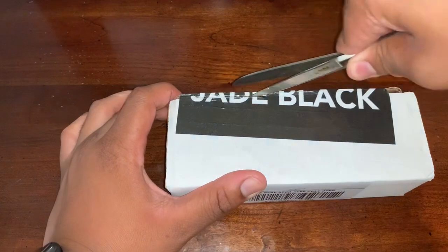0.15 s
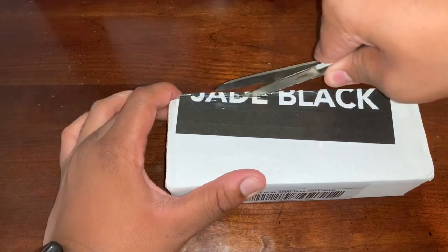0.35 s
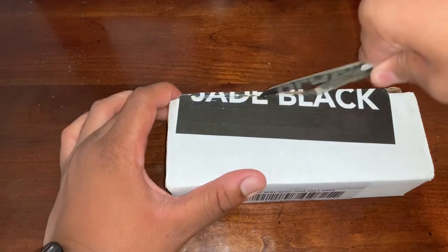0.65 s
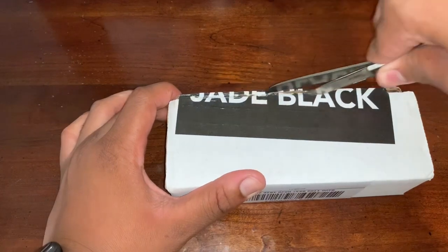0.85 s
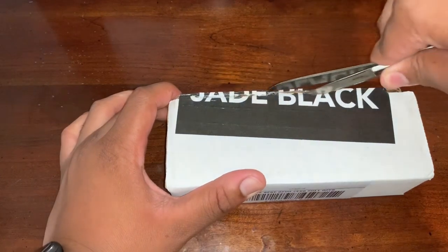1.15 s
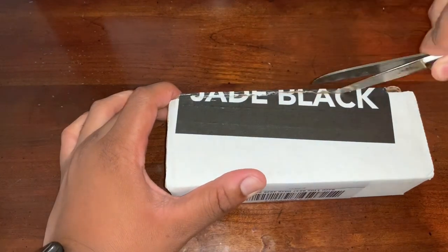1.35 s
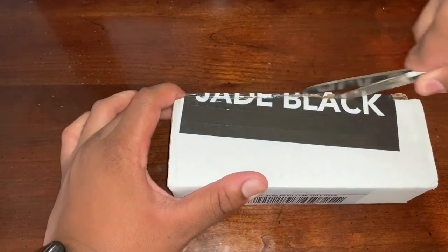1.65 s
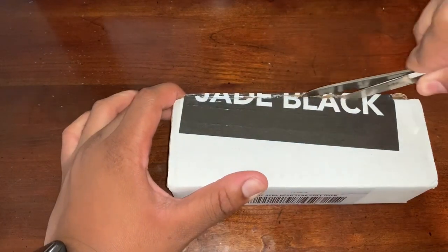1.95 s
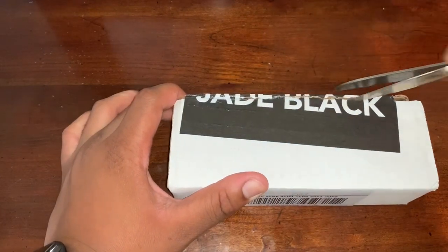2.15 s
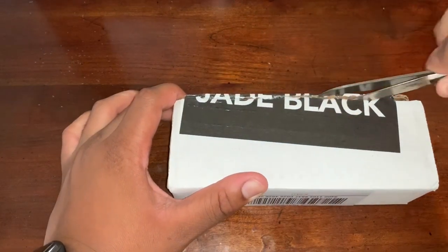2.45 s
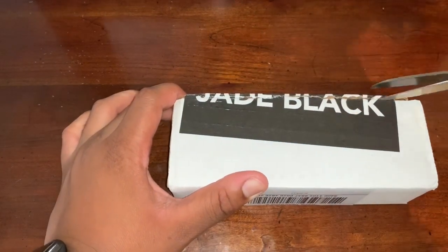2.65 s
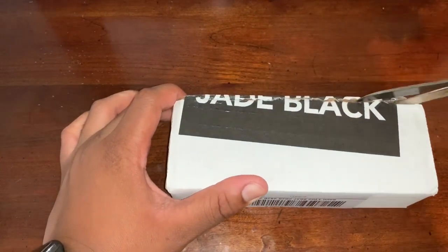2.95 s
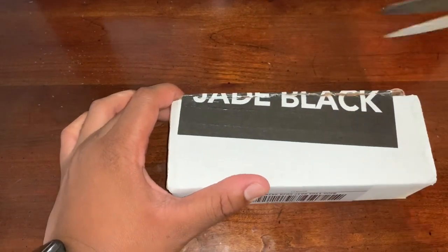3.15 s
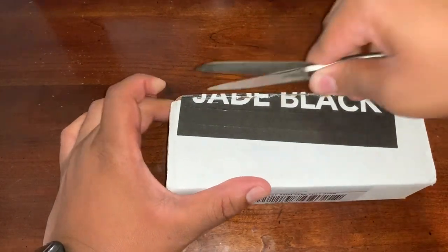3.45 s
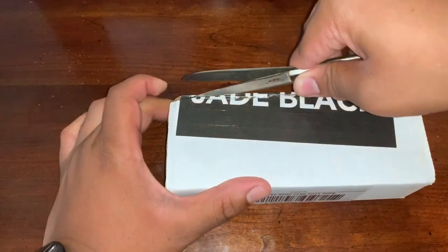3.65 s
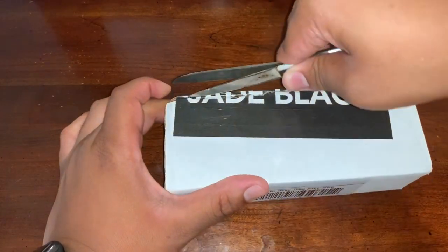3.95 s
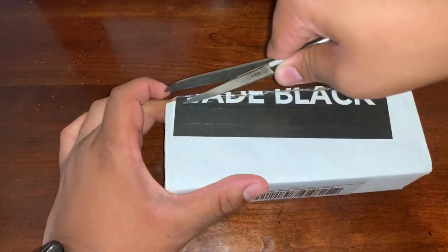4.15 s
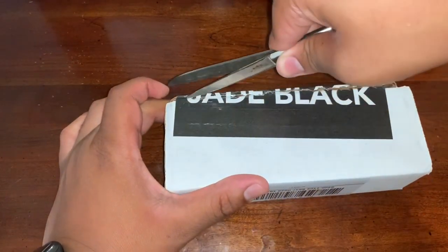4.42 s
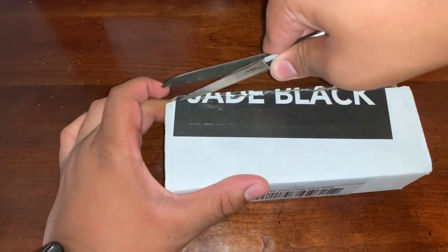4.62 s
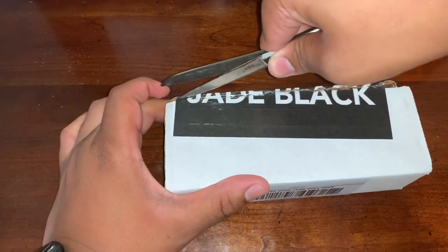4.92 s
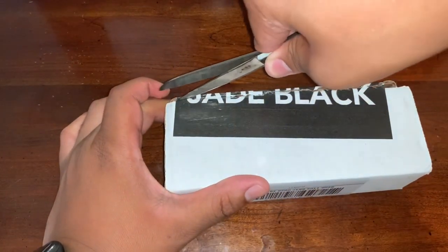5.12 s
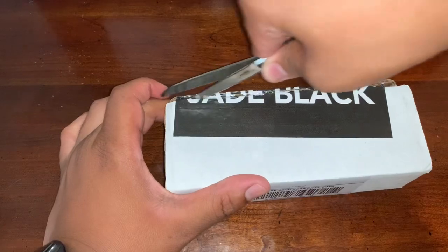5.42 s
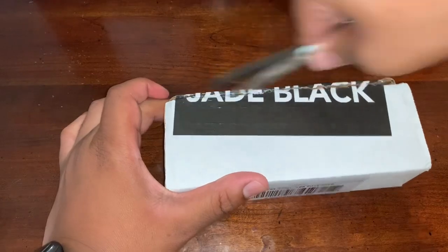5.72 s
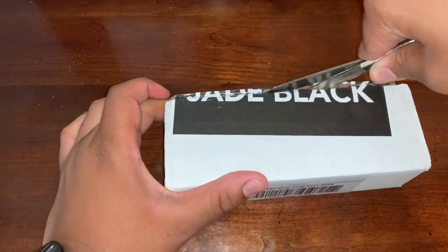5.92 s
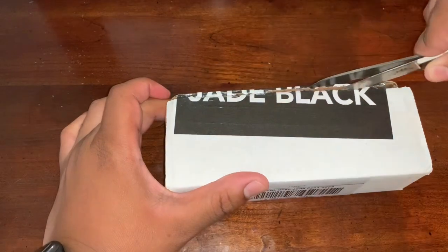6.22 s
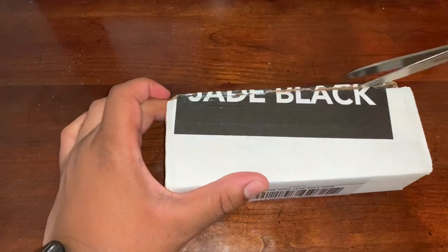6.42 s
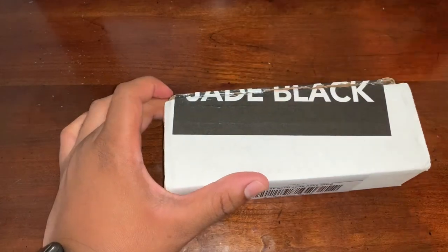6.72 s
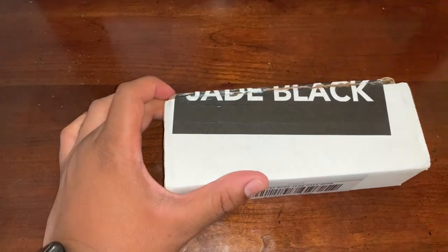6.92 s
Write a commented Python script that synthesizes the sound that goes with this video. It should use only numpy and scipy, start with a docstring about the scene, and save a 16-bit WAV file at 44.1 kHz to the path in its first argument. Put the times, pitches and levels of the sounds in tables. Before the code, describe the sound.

Close, dry cardboard cutting: short scratchy scrapes, popping tears and boxy thuds, a nearly silent middle, more ripping, and a bright metallic snip at the end.

```python
"""A small, quiet room: one blade of open scissors is dragged in short strokes through a box's taped seam.
Bursts of breaking fibres, filtered by box and blade resonances, make the rasp, snaps and rips.
Decaying sines thump as the cardboard wall springs back; in a pause the tip ticks and the blade brushes the lid.
At the end the scissors clack shut: a rattling clash and a short ring of blade modes."""
import sys
import numpy as np
from scipy import signal
from scipy.fft import rfft, irfft
from scipy.io import wavfile

SR = 44100
rng = np.random.default_rng(int(sys.argv[2]) if len(sys.argv) > 2 else 0)


def dump_mix(stems):
    """Bounce the given channels to the path in sys.argv[1] as a 16-bit WAV at rate SR."""
    frames = np.atleast_2d(stems).T  # one column per channel
    limited = np.clip(frames, -1, 1)  # hard clip at full scale
    pcm = np.round(limited * 32767).astype(np.int16)
    wavfile.write(sys.argv[1], SR, pcm)


N = 311738  # samples

# level_db columns set how strong each event is; some players add an offset.


def amp(db):
    """Decibels to gain."""
    return 10 ** (np.asarray(db) / 20)


def evened(x):
    """Scaled to rms 1."""
    return x / np.sqrt(np.mean(x ** 2) + 1e-20)


def read(points, hz):
    """A table joined by straight lines on a log-frequency axis."""
    point_hz, value = np.transpose(points)
    return np.interp(np.log(hz + 1), np.log(point_hz + 1), value)


def add(mix, start_s, sound):
    """Mixes a sound in at a given second."""
    first = max(round(start_s * SR), 0)
    part = mix[:, first:][:, :sound.shape[-1]]
    part += sound[..., :part.shape[1]]


def filtered(x, hz, kind="low", order=2):
    """A gentle low-pass or high-pass."""
    return signal.sosfilt(signal.butter(order, hz, kind, fs=SR, output="sos"), x)


def wander(count, hz):
    """Low-passed noise of rms 1."""
    noise = rng.standard_normal(count + SR)
    return evened(filtered(noise, hz)[SR:])  # first second dropped: filter settling


def ring(spectrum, peaks=(), tilt_db=0, size=4096):
    """Causal unit-energy impulse response: a smooth spectrum with resonances and a tilt per octave."""
    hz = abs(np.fft.fftfreq(size, 1 / SR))
    db = read(spectrum, hz) + tilt_db * np.log2(np.maximum(hz, 300))
    for centre_hz, width_hz, lift_db in peaks:
        db = db + lift_db / (1 + (2 * (hz - centre_hz) / width_hz) ** 2)
    minimum_phase = np.exp(np.conj(signal.hilbert(np.log(amp(db)))))
    response = np.fft.ifft(minimum_phase).real[:size // 2]
    return response[None] / np.linalg.norm(response)


def fibres(count, per_s, spread_db):
    """Two channels of snaps of very unequal size, at random moments shared by both."""
    size = amp(spread_db * np.minimum(rng.exponential(1, count), 4))
    size = size * (rng.random(count) < per_s / SR)
    return evened(size * rng.standard_normal((2, count)))


def burst(length_s, response, fade=0.11, rise_s=0.000076, spread_db=1.5):
    """A run of tiny fractures builds up and rings a body; energy is set to rms 1 over the run."""
    count = max(round(length_s * SR), 30)
    t = np.arange(count) / SR
    rise = (1 - np.exp(-(t + 1 / SR) / rise_s)) ** 2
    run = fibres(count, 14000, spread_db) * np.exp(-fade * t / length_s) * rise
    sound = signal.fftconvolve(run, response, axes=1)
    return sound * np.sqrt(count / (np.sum(sound ** 2, 1, keepdims=True) + 1e-20))


def modes(table, seconds, detune=1, stretch=0, relax_s=0.013):
    """Decaying sines; a stretched wall starts sharp and sinks to its own pitch."""
    t = np.arange(int(seconds * SR)) / SR
    warped = t + stretch * relax_s * (1 - np.exp(-t / relax_s))
    return sum(amp(db - 60 * t / t60_s) * np.sin(2 * np.pi * hz * detune * warped)
               for hz, db, t60_s in table)


def contact(resonances, spread_db, shift=0.022):
    """Each place on the seam favours other resonances and detunes them."""
    chance = rng.standard_normal((len(resonances), 2))
    return [(hz * (1 + shift * a), width_hz, lift_db + spread_db * b)
            for (hz, width_hz, lift_db), (a, b) in zip(resonances, chance)]


# room rumble spectrum: pitch_hz, relative_db
AIR_SPECTRUM = [(15, -63.5), (28, -20.5), (85, -4), (123, -1), (242, -19.5), (516, -21.5), (950, -32),
                (1260, -31.5), (3340, -43), (8590, -46.5), (16000, -52)]


def air(level_db=-58.0, waver_db=1.0, waver_hz=7):
    """Low rumble of the room: shaped noise, wavering a little."""
    hz = np.fft.rfftfreq(N, 1 / SR)
    rumble = irfft(rfft(rng.standard_normal((2, N))) * amp(read(AIR_SPECTRUM, hz)), N)
    return amp(level_db + waver_db * wander(N, waver_hz)) * evened(rumble)


# saw strokes: start_s, level_db, wall_db (extra wall sound)
STROKES = [(-.27, -51, -2), (.15, -52, 2), (.39, -52, -7.5), (0.557, -53, -4), (.72, -54, -3),
           (.955, -52.5, -6.5), (1.105, -48.5, -6), (1.32, -49.5, -0.5), (1.53, -49.5, -6.5),
           (1.77, -50, -2.5), (1.975, -49.5, -5), (2.195, -50.5, -3.5), (2.4, -46, -5.5),
           (2.597, -44, -2.5), (2.8, -48.5, -5.5), (5.125, -53.5, 2.5), (5.251, -45.5, 1.5),
           (5.539, -48.5, -2.5), (5.756, -51, 0), (5.935, -48.5, -6.5), (6.13, -56, 1.5),
           (6.275, -44.5, -7.5)]
# blade leaves the seam, next stroke goes forth: time_s
LIFTS_S = [1.725, 1.935, 2.998, 5.243, 5.464, 6.24, 6.485]
# fastest moment as share of a stroke; SLIP: stroke that ends in a lift
FORTH_PEAK, BACK_PEAK, SLIP_PEAK = 0.5, 0.44, 0.72
OVERLAP_S = 0.013  # forward stroke runs into the return
BRISK_S, REST_SHARE = 0.17, 0.35  # after a longer return the hand rests for this share of the excess


def sawing():
    """Strokes alternate forth and back until a lift: (start_s, fastest_s, end_s, level_db, wall_db)."""
    turns_s = np.sort([row[0] for row in STROKES] + LIFTS_S)
    rows, forth = [], True
    for start_s, db, wall_db in STROKES:
        turn_s = turns_s[turns_s > start_s][0]
        lifted = turn_s in LIFTS_S
        if lifted:
            end_s, peak = turn_s, SLIP_PEAK
        elif forth:
            end_s, peak = turn_s + OVERLAP_S, FORTH_PEAK
        else:
            end_s, peak = turn_s - REST_SHARE * (turn_s - start_s - BRISK_S), BACK_PEAK
        fastest_s = start_s + np.clip(peak, .1, .9) * (end_s - start_s)
        rows.append((start_s, fastest_s, end_s, db, wall_db))
        forth = not forth or lifted
    return rows


LURCH_DB, LURCH_S = 18.5, 0.041  # gain added to the rip level, decay time constant


def lurch(t):
    """Gain of the rasp as the blade shoots ahead after each rip and is braked again."""
    return 1 + sum(amp(db + LURCH_DB) * (t > rip_s) * np.exp(-abs(t - rip_s) / LURCH_S)
                   for rip_s, db, _, _ in RIPS)


SLIP_HZ, SLIP_SPREAD, SLIP_DB = 170.85, .2, 8  # mean rate, unevenness, depth before the wedged scaling


def judder(count, wedged):
    """Gain of an edge that sticks and slips in an uneven rhythm, the deeper the more it is wedged."""
    turns = np.cumsum(SLIP_HZ * (1 + SLIP_SPREAD * wander(count, SLIP_HZ))) / SR
    return evened(amp(SLIP_DB * (1 + wedged) / 2 * np.cos(2 * np.pi * turns)))


def places(size, count):
    """Overlapping fades that hand a stroke on from one place to the next."""
    travel = np.linspace(0, count - 1, size)
    return [np.maximum(1 - abs(travel - place), 0) for place in range(count)]


# rasp spectrum: pitch_hz, relative_db_per_hz
RASP_SPECTRUM = [(40, -10), (110, 12), (180, 15), (320, -2), (560, 1.5), (1000, -3), (1500, 2),
                 (2500, -2.5), (5000, -3), (7000, -4.5), (10500, -6.5), (15500, -10.5)]
# box resonances, blade pressed in: pitch_hz, width_hz, lift_db (above the spectrum)
BOX = [(427, 160, 5.5), (540, 100, 7), (690.6, 33, 6), (866.5, 53, 9.5), (1174.6, 77, 8.5),
       (1279.4, 25, 8.5), (1494, 130, 7.5), (1840, 180, 2)]
# resonances of the blade held in the seam, before damping: pitch_hz, width_hz, lift_db
EDGE = [(2265, 82, 4.5), (2835, 150, 6), (3120, 170, -5), (3465, 340, 9.5), (4393, 60, 2.5),
        (10430, 1600, 2.5)]
WEDGED_DB = 2.5  # wall_db around which the blade wedges


def rasp(strokes, spectrum, level_db=5, uneven_db=1.2, uneven_hz=90, clump_db=3.0, arch=2.21,
         contact_db=3.5, snap_db=-7):
    """In each stroke the edge speeds up and slows, breaking thousands of fibres a second."""
    out = np.zeros((2, N))
    for start_s, fastest_s, end_s, db, wall_db in strokes:
        t = np.arange(max(start_s, 0), end_s, 1 / SR)
        # the later the peak, the slower the build-up and the more abrupt the stop
        peak = (fastest_s - start_s) / (end_s - start_s)
        build = ((t - start_s) / (fastest_s - start_s)) ** peak
        stop = abs((end_s - t) / (end_s - fastest_s)) ** (1 - peak)
        speed = (build * stop) ** arch
        wedged = 1 / (2 + np.exp(WEDGED_DB - wall_db))
        force = speed * lurch(t) * amp(db + level_db + uneven_db * wander(len(t), uneven_hz))
        fine = fibres(len(t), 3500, 2.3) * force
        coarse = fibres(len(t), 400, 1.4) * force * amp(snap_db)  # whole bundles give way
        # clumps of board drive the wall, which answers in the lower range
        clumps = amp(wall_db + clump_db * wander(len(t), uneven_hz))
        crunch = (fine + coarse) * judder(len(t), wedged) * clumps
        drive = filtered(fine, 1100, "high", order=1) + filtered(crunch, 2100)
        # a wedged blade is damped
        steel = [(hz, width_hz, lift_db * (1 - wedged)) for hz, width_hz, lift_db in EDGE]
        for share in places(len(t), count=4):
            body = ring(spectrum, contact(BOX + steel, contact_db))
            add(out, t[0], signal.fftconvolve(drive * share, body, axes=1))
    return out


# tip touches the tape: start_s, level_db
TICKS = [(0.015, -35.5), (0.14, -41.5), (0.187, -40.5), (1.106, -47.5), (1.465, -37), (1.747, -46),
         (2.992, -38.5), (3.167, -59), (3.206, -50), (3.718, -44.5), (4.045, -51), (4.26, -59),
         (4.364, -53), (4.618, -55), (4.787, -61.5), (5.149, -48)]
# box wall flexes under the fingers: start_s, level_db
KNOCKS = [(2.807, -47), (2.924, -42), (3.023, -51.5), (3.385, -58), (3.504, -56.5), (3.882, -54.5),
          (4.232, -54), (4.972, -53)]
# flexing wall spectrum: pitch_hz, relative_db_per_hz
FLEX_SPECTRUM = [(60, 11.5), (250, 10.5), (450, 14.5), (750, 7.5), (1300, -5), (3000, -27), (16000, -46)]


def handling():
    """Short bursts ring the box: light ticks of the tip, dull knocks of the flexing wall."""
    out = np.zeros((2, N))
    for start_s, db in TICKS:
        add(out, start_s, amp(db) * burst(0.003, ring(RASP_SPECTRUM, BOX, tilt_db=2.0)))
    for start_s, db in KNOCKS:
        add(out, start_s, amp(db) * burst(0.0081, ring(FLEX_SPECTRUM, BOX)))
    return out


# fibre bundle snaps under the edge: start_s, level_db
SNAPS = [(0.029, -48), (0.251, -37), (1.412, -39.5), (1.618, -46), (1.853, -43.5), (1.888, -51.5),
         (2.032, -41.5), (2.141, -42), (2.492, -38.5), (2.955, -44), (4.096, -62), (4.66, -59.5),
         (5.607, -39.5)]
# tearing spectrum, snaps and rips: pitch_hz, relative_db_per_hz
TEAR_SPECTRUM = [(40, -21), (130, 1.5), (260, -3.5), (480, -3.5), (750, -10), (1000, -7.5), (1400, -8.5),
                 (2800, -14.5), (5000, -15.5), (10500, -18), (15500, -20)]


def snaps(length_s=0.005, flap_hz=1150, flap_width_hz=1100, flap_db=9, contact_db=4):
    """Each snapping bundle rings its own small patch of board."""
    out = np.zeros((2, N))
    for start_s, db in SNAPS:
        peaks = contact(BOX, contact_db) + [(flap_hz, flap_width_hz, flap_db)]
        add(out, start_s, amp(db) * burst(length_s, ring(TEAR_SPECTRUM, peaks)))
    return out


# blade catches and tears through: start_s, level_db, length_s, bright_db_per_octave
RIPS = [(0.5476, -20.5, 0.0095, 0.5), (0.5828, -18, 0.01, 0), (0.5985, -13.5, 0.0049, -1.5),
        (1.227, -36.5, 0.007, 0.5), (1.244, -31.5, 0.015, 2), (1.284, -34, 0.014, 1),
        (1.545, -43, 0.0034, -1.5), (2.248, -21.5, 0.0086, 0), (2.608, -19.5, 0.0071, 1),
        (2.628, -17.5, 0.015, -1), (5.2, -40.5, 0.0096, 7.5), (5.667, -31, .032, 3),
        (5.689, -24, 0.0092, -4), (5.7827, -11, .004, -0.9), (5.794, -33, 0.032, 1.5),
        (6.171, -36, 0.0062, -3), (6.407, -25.5, 0.0048, 1), (6.417, -29.5, 0.014, -6),
        (6.435, -25.5, 0.0055, 4.5), (6.441, -34, 0.03, -3), (6.461, -26, 0.004, -1.5),
        (6.4728, -23, .006, -2.5)]
# a stronger rip frees a larger, lower flap
FLAP_HZ, FLAP_AT_DB, FLAP_DB_PER_OCTAVE, FLAP_TOP_HZ = 520, -15.5, 13, 1350


def rips(flap_db=5.0, flap_width=0.64, strain_db=-19, strain_s=0.0081, crack_db=16, crack_tilt_db=-2.0,
         tear_db=-1, contact_db=2.5):
    """Fibres strain, then the tape crackles and the flap cracks free within it, ringing flap and box."""
    out = np.zeros((2, N))
    for start_s, db, length_s, bright_db in RIPS:
        octaves_up = max(FLAP_AT_DB - db, 0) / FLAP_DB_PER_OCTAVE
        hz = min(FLAP_HZ * 2 ** octaves_up, FLAP_TOP_HZ)
        peaks = contact(BOX + EDGE, contact_db) + [(hz, flap_width * hz, flap_db)]
        body = ring(TEAR_SPECTRUM, peaks, bright_db)
        strain = burst(strain_s, body, fade=-1.0)
        crack = ring(TEAR_SPECTRUM, peaks, bright_db + crack_tilt_db) * [[1], [0]]
        tear = burst(length_s, body, rise_s=0.00031, spread_db=4.0)
        add(out, start_s - strain_s, amp(db + strain_db) * strain)
        add(out, start_s, amp(db + tear_db) * tear)
        add(out, start_s + .001, amp(db + crack_db) * crack)
    return out


# wall springs back as the blade comes free: start_s, level_db
THUMPS = [(0.558, -17), (.604, -16.5), (1.256, -27.5), (1.3, -30), (1.558, -38.5), (2.2602, -12.5),
          (2.619, -16), (2.647, -16), (5.207, -29.5), (5.235, -37.5), (5.465, -36.5), (5.702, -20),
          (5.793, -21.5), (6.177, -35), (6.4424, -17), (6.481, -15.5)]
# slow wall modes, before the grip shifts them: pitch_hz, level_db, t60_s
WALL = [(134.2, 1.5, 0.125), (160, -6.5, 0.043), (234, -11, .04), (403, -11, .035), (83, -15.5, 0.22)]


def thumps(swing_s=0.00057, low_hz=88, stretch=0.25):
    """The wall of the box swings back and settles; the changing grip shifts its pitch."""
    out = np.zeros((2, N))
    grips = rng.uniform(0.9, 1.2, len(THUMPS))
    for (start_s, db), grip in zip(THUMPS, grips):
        swing = modes(WALL, .3, grip, stretch)
        onset = 1 - np.exp(-np.arange(len(swing)) / SR / swing_s)
        add(out, start_s, amp(db) * swing * onset)
    return filtered(out, low_hz, "high")  # a small box radiates little deep bass


# flat of the blade brushes the lid: start_s, length_s, level_db
RUBS = [(3.489, 0.03, -60.5), (3.514, 0.058, -64.5), (3.637, 0.15, -64.5), (3.788, 0.14, -68),
        (4.029, 0.047, -65), (4.088, 0.04, -58), (4.432, 0.057, -61.5), (4.39, 0.21, -67),
        (4.593, 0.046, -59), (4.642, 0.035, -62.5)]
# brushing spectrum: pitch_hz, relative_db_per_hz
SCUFF_SPECTRUM = [(100, 6.5), (700, -10), (1500, 0.5), (2600, -9.5), (5000, -9.5), (10500, -10),
                  (15500, -18.5)]
RUB_WALL_DB, RUB_PEAK = -1, 0.48  # extra wall sound; fastest moment as share of a rub


def brushing():
    """Light passes over the lid, all of one shape: (start_s, fastest_s, end_s, level_db, wall_db)."""
    return [(start_s, start_s + RUB_PEAK * length_s, start_s + length_s, db, RUB_WALL_DB)
            for start_s, length_s, db in RUBS]


def scatter(x, level_db=-7, t60_s=.06, above_hz=2400):
    """Close reflections off the hands and the box soften edges; things so small reflect only treble."""
    t = np.arange(SR // 8) / SR
    taps = rng.standard_normal((2, len(t))) * amp(-60 * t / t60_s) * (t > .001)
    taps = taps / np.linalg.norm(taps[0])
    near = signal.oaconvolve(filtered(x, above_hz, "high"), taps, axes=1)[:, :N]
    return x + amp(level_db) * near


# steel meets steel as the scissors close: start_s, level_db, length_s
CLACKS = [(6.823, -40, 0.0059), (6.842, -44, 0.042), (6.8665, -17.5, 0.0064)]
# clash spectrum: pitch_hz, relative_db_per_hz
STEEL_SPECTRUM = [(100, -43.5), (1400, -22.5), (3100, -24), (4000, -9), (5700, 4), (7800, -0.5),
                  (10500, 10.5), (13500, 0), (15300, 17), (16500, -14)]
# free blade modes: pitch_hz, level_db, t60_s
BLADES = [(3710, -28, 0.15), (4310, -36, 0.12), (6320, -22, 0.15), (7020, -14, 0.14), (8380, -21, .16),
          (9800, -20, .15), (10650, -7, 0.11), (10745, -15, 0.12), (12500, 5, .12), (13300, -14, 0.14),
          (14900, -14.5, 0.17), (15308, 1, .15)]


def scissors(ring_db=-18.5, clash_db=9, clash_width_hz=160):
    """The blades touch, slide and clack shut: a rattling clash, then their own short ring."""
    clash, ringing = np.zeros((2, 2, N))
    steel = ring(STEEL_SPECTRUM, [(hz, clash_width_hz, clash_db) for hz, _, _ in BLADES])
    for start_s, db, length_s in CLACKS:
        add(clash, start_s, amp(db) * burst(length_s, steel, fade=0.28))
        add(ringing, start_s, amp(db + ring_db) * modes(BLADES, .35))
    return scatter(clash, level_db=1.5, t60_s=0.069) + ringing * [[1], [0]]


BEND_S, BEND_HZ = .0065, 266  # delay of the deepest tones; pitch that takes half as long


def bending(x):
    """High tones cross the board faster than low ones, so that every snap drops in pitch."""
    hz = np.fft.rfftfreq(N + SR, 1 / SR)
    phase = -2j * np.pi * BEND_S * BEND_HZ * np.log1p(hz / BEND_HZ)
    return irfft(rfft(x, N + SR) * np.exp(phase), N + SR)[:, :N]


# reverberation: pitch_hz, t60_s
ROOM_DECAY = [(120, 0.38), (400, .24), (1500, 0.11), (5000, 0.24), (14000, 0.16)]


def room(x, gap_s=.004):
    """Dense reflections, each band dying at its own speed."""
    hz, t, z = signal.stft(rng.standard_normal((2, SR // 2)), SR, nperseg=256)
    decay = amp(-60 * t / read(ROOM_DECAY, hz)[:, None])
    tail = signal.istft(z * decay, SR, nperseg=256)[1]
    tail = np.pad(tail, ((0, 0), (round(gap_s * SR), 0)))
    return signal.fftconvolve(x, tail / np.linalg.norm(tail[0]), axes=1)[:, :N]


# likeness of the two microphone ports: pitch_hz, likeness (clipped to 0-1)
LIKENESS = [(60, 0.9), (200, 0.82), (450, 0.77), (800, 0.08), (1500, 0.59), (3000, 0.21), (8000, 0.03),
            (10500, 0.87), (12000, 3.5)]
# port balance: pitch_hz, left_minus_right_db
BALANCE = [(50, -2.5), (130, -2.5), (400, -1), (750, 3.5), (1300, 0.5), (2200, 2), (4500, -1.5),
           (12000, -0.5)]


def ports(x):
    """Channel one reaches both ports alike, two sets them apart; treble reaches the right port first."""
    hz = np.fft.rfftfreq(N, 1 / SR)
    a, b = rfft(x)
    same = np.clip(read(LIKENESS, hz), 0, 1)
    shared = a * np.sqrt((1 + same) / 2)
    apart = b * np.sqrt((1 - same) / 2)
    lag = np.exp(-2j * np.pi * np.maximum(hz - 3800, 0) * .000312)  # s, above 3800 Hz
    lean = amp(read(BALANCE, hz) / 2)
    return irfft(np.array([(shared + apart) * lag * lean, (shared - apart) / lean]), N)


def scene(cut_room_db=-13, thump_room_db=-15, steel_room_db=-11):
    """Cutting, thumps and steel close to the microphone, with a little room."""
    strokes = rasp(sawing(), RASP_SPECTRUM)
    rubs = rasp(brushing(), SCUFF_SPECTRUM, level_db=2.5, snap_db=-6.0)
    board = strokes + rubs + rips() + snaps() + handling()
    cut = scatter(bending(board), level_db=-7.5, t60_s=0.14)
    thump, steel = thumps(), scissors()
    wet = room(amp(cut_room_db) * cut + amp(thump_room_db) * thump + amp(steel_room_db) * steel)
    return ports(cut + thump * [[1], [0]] + steel + wet + air())


EDGE_HZ = 15850  # low-pass corner


def record(dry):
    """The band limit of the recorder: a steep linear-phase low-pass."""
    lowpass = signal.firwin(255, EDGE_HZ, window=("kaiser", 9), fs=SR)
    return signal.oaconvolve(dry, lowpass[None], "same", axes=1)


dry = scene()
out = record(dry)
dump_mix(out)
```